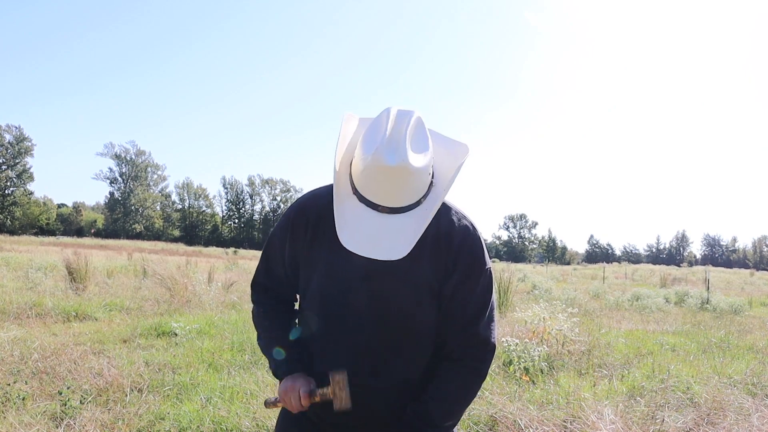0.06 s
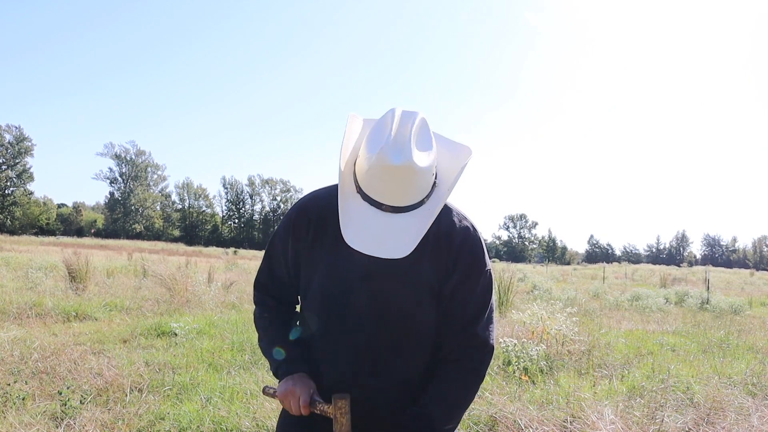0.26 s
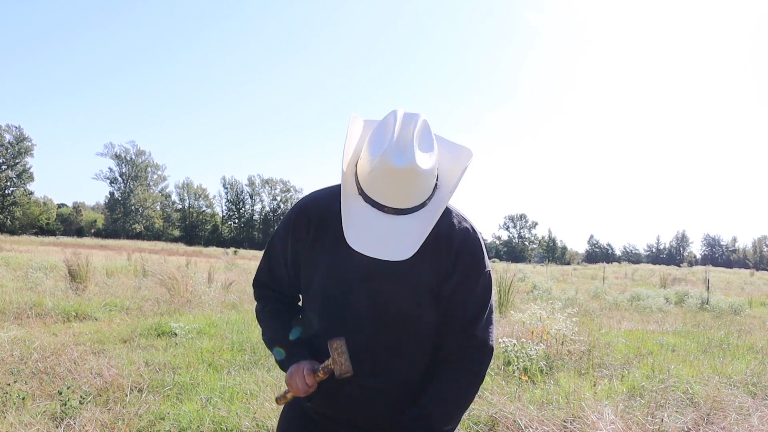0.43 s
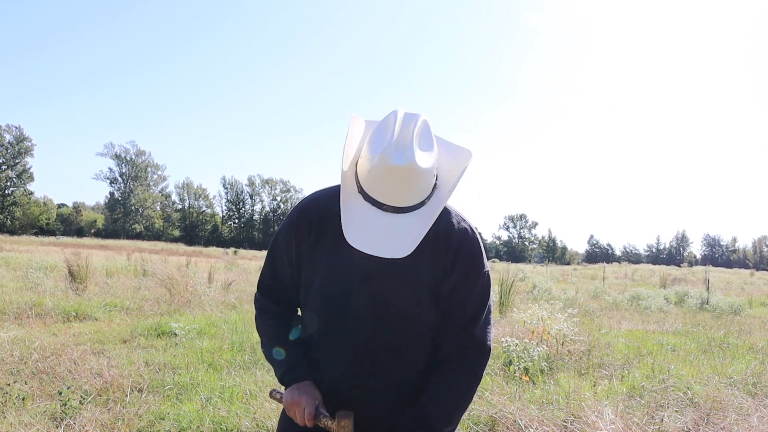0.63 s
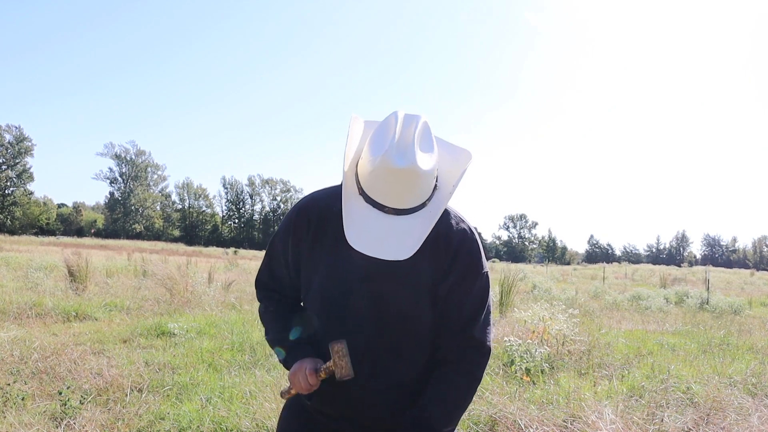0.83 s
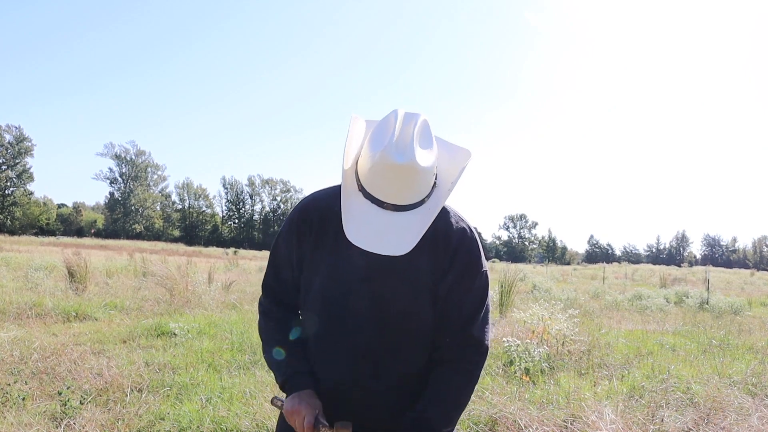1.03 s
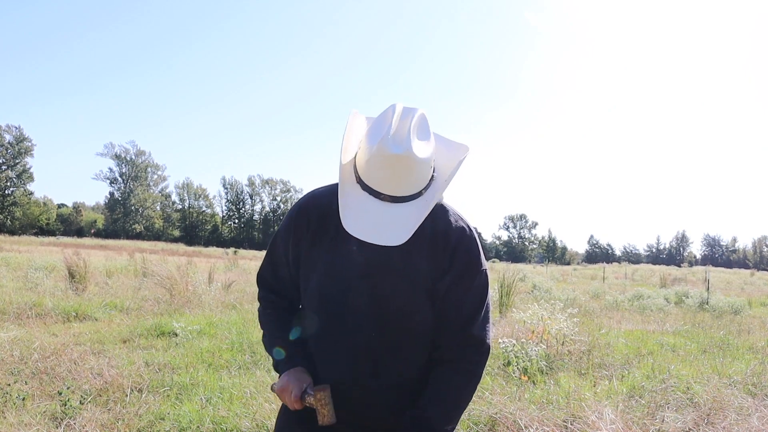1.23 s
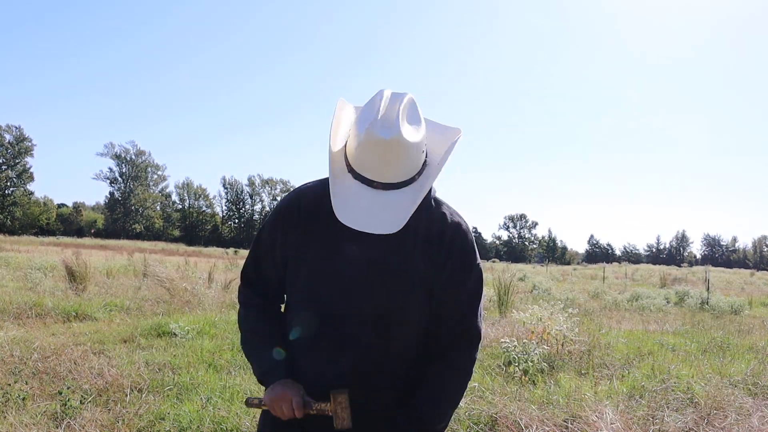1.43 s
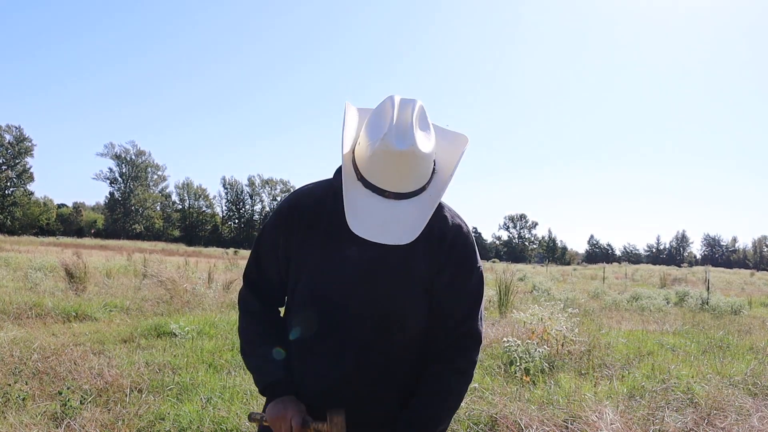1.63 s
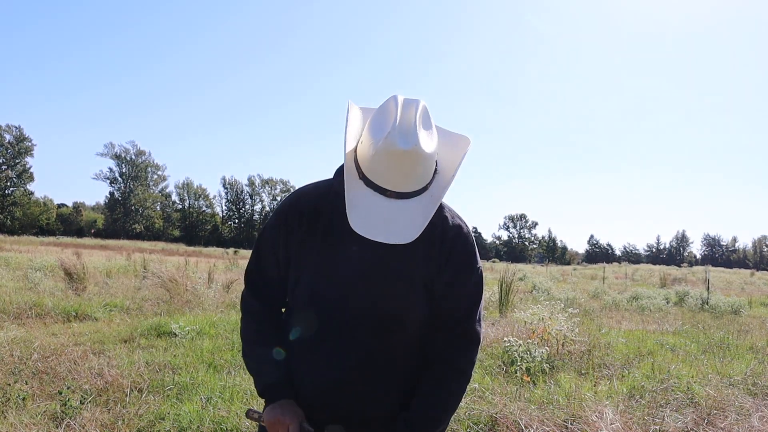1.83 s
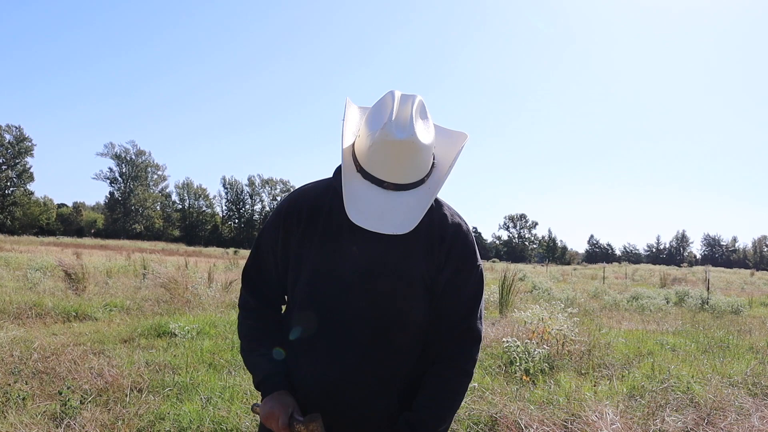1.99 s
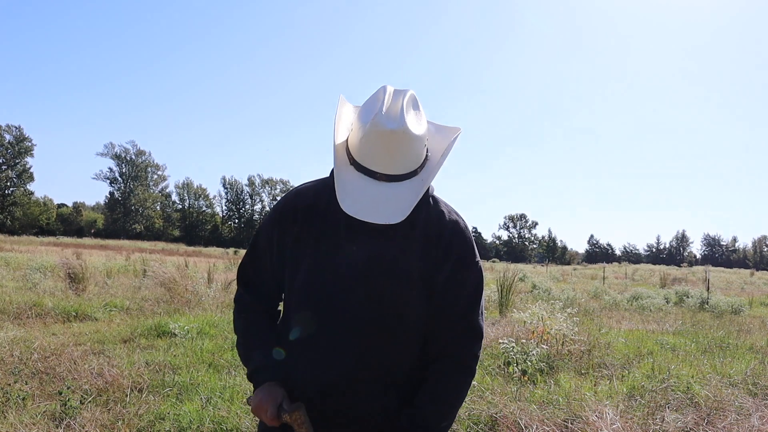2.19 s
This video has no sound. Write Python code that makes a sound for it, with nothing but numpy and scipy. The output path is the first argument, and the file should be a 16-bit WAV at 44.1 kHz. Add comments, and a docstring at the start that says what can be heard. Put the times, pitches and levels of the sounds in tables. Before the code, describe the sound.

Four sharp hammer blows drive a post into the ground while insects chirp in a field.

```python
"""A hammer drives a short post into a field with four blows, close to the microphone.
Each blow cracks, the post judders a few milliseconds into the soil and knocks more hollowly as it
sinks; the hammer head rings and the soil thuds. A light touch precedes the last blow.
Insects rasp their wings in the grass, far birds whistle, and a breeze buffets the microphone
over soft open air and a far rush."""
import sys
import numpy as np
from scipy import signal
from scipy.fft import rfft, irfft, next_fast_len
from scipy.io import wavfile
from scipy.ndimage import uniform_filter1d

SR = 44100
rng = np.random.default_rng(int(sys.argv[2]) if len(sys.argv) > 2 else 0)


def log_audio(samples):
    """Write samples as a 16-bit WAV file to the path given in sys.argv[1]."""
    # one column per channel
    frames = np.atleast_2d(samples).T
    # limit to full scale, then quantise
    limited = np.clip(frames, -1, 1)
    pcm = np.round(limited * 32767).astype(np.int16)
    wavfile.write(sys.argv[1], SR, pcm)


N = 103635

# spectrum of the crack and the grit: freq_hz, density_db
CRACK_SPECTRUM = [(200, -18.5), (1000, -6), (2000, -1), (3000, 5.5), (6000, 5.5), (10000, -3),
                  (13000, -3.5), (16000, -11.5)]


def undb(db):
    """Decibels to gain."""
    return 10 ** (np.asarray(db) / 20)


def unit(x):
    """Scale to rms 1."""
    return x / np.sqrt(np.mean(x ** 2) + 1e-18)


def colour(x, spectrum):
    """Minimum-phase filter through (freq_hz, gain_db) points."""
    hz, db = np.array(spectrum).T
    size = next_fast_len(len(x) + 4096, True) * 2
    bin_hz = np.arange(size // 2 + 1) * SR / size
    gain_db = np.interp(np.log(bin_hz + 1e-9), np.log(hz), db)
    cepstrum = irfft(np.log(undb(gain_db)))
    cepstrum[1:size // 2] *= 2
    cepstrum[size // 2 + 1:] = 0
    return irfft(rfft(x, size) * np.exp(rfft(cepstrum)))[:len(x)]


def noise(spectrum, count):
    """Coloured noise, rms 1."""
    return unit(colour(rng.standard_normal(count), spectrum))


def resonate(x, hz, width_hz):
    """Resonance, gain 1 at centre."""
    return signal.lfilter(*signal.iirpeak(hz, hz / width_hz, SR), x)


def walk(rate_hz):
    """Smooth random wander, rms 1."""
    hold = int(SR / rate_hz)
    steps = np.repeat(rng.standard_normal(N // hold + 1), hold)
    return unit(uniform_filter1d(uniform_filter1d(steps, hold), hold)[:N])


def fade(t, t60_s):
    """Full level until t = 0, then exponential decay."""
    return np.exp(-np.log(1000) * np.maximum(t, 0) / t60_s)


def swell(centre_s, length_s):
    """Gaussian envelope, peak 1."""
    return np.exp(-(2 * (np.arange(N) / SR - centre_s) / length_s) ** 2)


def contour(points):
    """Straight lines through (time_s, level_db) points."""
    return np.interp(np.arange(N) / SR, *np.array(points).T)


def ring(t, modes):
    """Free ringing of (pitch_hz, level_db, t60_s) modes."""
    return sum(undb(db) * fade(t, t60_s) * np.sin(2 * np.pi * hz * t) for hz, db, t60_s in modes)


def swelling_ring(t, delay_s, modes, rise_s):
    """Modes driven up to a peak near the delay, then left to ring."""
    return ring(t - delay_s, modes) * np.minimum(t / rise_s, 1) * np.exp(np.minimum(t - delay_s, 0) / rise_s)


def add(out, start_s, sound):
    """Mix in at start_s."""
    i = int(start_s * SR)
    out[i:i + len(sound)] += sound[:max(N - i, 0)]


def field():
    """Soft open air; a far rush dies away and returns."""
    # spectra: freq_hz, density_db
    air_spectrum = [(30, -1.5), (120, 8.5), (250, 3.5), (400, 1.5), (700, -3), (1400, -15.5), (2000, -13),
                    (3200, -14.5), (5000, -20.5), (7000, -21.5), (11000, -19.5), (14500, -14.5),
                    (16000, -21.5)]
    rush_spectrum = [(200, -21), (450, -10.5), (700, -5), (1050, 3.5), (1400, -2), (2000, -17.5),
                     (3500, -25.5), (8000, -48)]
    # rush envelope: time_s, level_db
    rush_levels = [(0, -49), (.55, -52), (1.35, -52), (1.9, -60.5), (2.35, -52.5)]
    return undb(-48) * noise(air_spectrum, N) + undb(contour(rush_levels)) * noise(rush_spectrum, N)


def wind():
    """Gusts rumble and puff on the microphone."""
    # gust envelope: time_s, relative_db
    gusts = [(0, -44.5), (.28, -39), (.33, -27.5), (.47, -27.5), (.53, -35.5), (.87, -25.5), (.95, -23),
             (1.06, -18.5), (1.22, -22), (1.28, -25), (1.35, -21), (1.43, -29), (1.62, -30.5),
             (1.75, -25.5), (1.83, -32), (1.89, -28), (2.0, -28.5), (2.35, -29)]
    # sharper buffets: centre_s, length_s, level_db
    puffs = [(0.911, 0.019, -32), (0.945, .03, -21), (1.052, 0.024, -18.5), (1.112, 0.034, -24),
             (1.732, 0.25, -35)]
    # spectra: freq_hz, density_db
    rumble_spectrum = [(12, -4), (22, 6), (45, 1.5), (65, -6.5), (100, -7.5), (150, -18), (220, -28),
                       (320, -30.5), (600, -47), (1500, -90)]
    puff_spectrum = [(40, -15.5), (100, 1), (170, -4), (260, -10), (400, -34.5), (900, -41.5), (2000, -60)]
    rumble_db = 1 + contour(gusts) + walk(rate_hz=54)
    puff_gain = sum(undb(db) * swell(centre_s, length_s) for centre_s, length_s, db in puffs)
    return undb(rumble_db) * noise(rumble_spectrum, N) + puff_gain * noise(puff_spectrum, N)


def rasp(hz, width_hz, tooth_hz=165):
    """Wing teeth rasp a narrow resonance; rms 1."""
    rate_hz = tooth_hz * (1 + .1 * walk(27))
    strokes = 1 + .6 * np.sin(2 * np.pi * np.cumsum(rate_hz) / SR)
    friction = strokes * rng.standard_normal(N)
    return unit(resonate(resonate(friction, hz, width_hz), hz, width_hz))


def insect(chirps, hz, width_hz, length_s):
    """One insect rasps in short swelling chirps."""
    return rasp(hz, width_hz) * sum(undb(db) * swell(centre_s, length_s) for centre_s, db in chirps)


def insects():
    """A near insect and a lower-pitched one chirp over a wavering chorus."""
    # chirps: centre_s, level_db
    near_chirps = [(.04, -50), (.195, -46.5), (.41, -51), (.61, -48.5), (.805, -54), (.965, -50.5),
                   (1.2, -54.5), (1.405, -51.5), (1.515, -49), (1.71, -48.5), (1.925, -51), (2.11, -48.5),
                   (2.3, -48)]
    low_chirps = [(.135, -54), (.32, -63), (.51, -55.5), (.69, -64), (.875, -59), (1.09, -57),
                  (1.28, -59.5), (1.46, -58), (1.645, -55), (1.84, -63), (2.02, -59), (2.2, -63)]
    # far insect groups: pitch_hz, width_hz, level_db
    groups = [(8530, 900, -61.5), (8800, 630, -57), (9370, 650, -57.5), (9720, 700, -58.5)]
    chorus = sum(undb(db - 0.4 * walk(rate_hz=19)) * rasp(hz, width_hz) for hz, width_hz, db in groups)
    near = insect(near_chirps, hz=8950, width_hz=380, length_s=.062)
    low = insect(low_chirps, hz=7850, width_hz=700, length_s=.07)
    return chorus + near + low


def tilt_db(hz, db_per_oct, pivot_hz=3000):
    """Brightness slope about the pivot."""
    return db_per_oct * np.log2(hz / pivot_hz)


def judder(t, slide_s, t60_s, grit_db, db_per_oct):
    """The post sticks and slips through soil: dense jolts ring its body, grit rasps along it."""
    # damped post resonances: pitch_hz, width_hz, relative_db
    modes = [(831.4, 160, -0.5), (1220, 210, 0.5), (1501, 270, -3), (1944, 200, -9), (2532, 122, 3),
             (2908, 191.6, 0.5), (3290, 130, 3), (3713, 200, -5.5), (4027, 200, -8.5), (4830, 200, -1),
             (5360, 244, 0), (6830, 780, -12), (8160, 410, -7.5), (9830, 1200, -11), (12160, 700, -28.5)]
    slip_rate_hz, spread_db, sag_db = 4865, 2.5, 2.5
    rebound_s, rebound_width_s, rebound_db = 0.0038, 0.00037, 4.5  # the hammer face lands again
    slips = (rng.random(len(t)) < slip_rate_hz / SR) * rng.choice([-1, 1], len(t))
    jolts = slips * undb(spread_db * rng.standard_normal(len(t)))
    push = undb(-sag_db * np.minimum(t / slide_s, 1))
    rebound = undb(rebound_db * np.exp(-((t - rebound_s) / rebound_width_s) ** 2))
    force = jolts * push * rebound * fade(t - slide_s, t60_s)
    body = np.zeros(len(t))
    for k, (hz, width_hz, db) in enumerate(modes):
        gain = (-1) ** k * undb(db + tilt_db(hz, db_per_oct)) * np.sqrt(width_hz)
        body += gain * unit(resonate(force, hz, width_hz))
    body /= np.sqrt(np.sum(body ** 2) / (slide_s * SR))
    grit = undb(grit_db) * noise(CRACK_SPECTRUM, len(t)) * push * fade(t - slide_s, t60_s=0.025)
    return body + grit


def post_knock(t, delay_s, knock_db, clack_db):
    """The post knocks hollowly and brakes in the soil with a quickly damped clack."""
    # modes: pitch_hz, relative_db, t60_s
    knock_modes = [(951, 1.5, 0.055), (1000, -21, 0.14), (1386, -22.5, 0.047), (567, -13, 0.023)]
    clack_modes = [(894, -5, 0.016), (284, -5, 0.018)]
    knock = undb(knock_db) * swelling_ring(t, delay_s, knock_modes, rise_s=0.0053)
    clack = undb(clack_db) * swelling_ring(t, delay_s, clack_modes, rise_s=0.0005)
    return knock + clack


def head_ring(t, head_db, db_per_oct):
    """The hammer head rings in three modes."""
    # head modes: pitch_hz
    pitches_hz = (2729, 4735, 5195)
    # ring per mode: relative_db, t60_s
    decays = [(-9, 0.11), (-10.5, .04), (-1.5, 0.074)]
    return ring(t, [(hz, head_db + db + tilt_db(hz, db_per_oct), t60_s)
                    for hz, (db, t60_s) in zip(pitches_hz, decays)])


def soil(t, slide_s, thud_db):
    """Soil thud and a brief scatter off the ground; both decay after the slide."""
    # spectra: freq_hz, density_db
    thud_spectrum = [(80, 0.5), (160, -7), (275, 5.5), (400, -9), (560, -3.5), (700, -8.5), (1500, -23.5),
                     (6000, -64)]
    scatter_spectrum = [(150, -5.5), (300, -12), (1000, 6), (2000, -9.5), (3000, -7), (6000, -18),
                        (10000, -29), (16000, -18)]
    thud = undb(thud_db) * noise(thud_spectrum, len(t)) * fade(t - slide_s, t60_s=0.13)
    scatter = undb(-27) * noise(scatter_spectrum, len(t)) * fade(t - slide_s, t60_s=0.067)
    return thud + scatter


def hammer():
    """Each blow cracks on contact and excites post, head and soil."""
    # blows: start_s, judder_db, slide_s, judder_t60_s, crack_db, knock_db, clack_db, knock_delay_s,
    # head_db, head_db_per_oct, thud_db, grit_db, post_db_per_oct
    blows = [(.221, -9, 0.0077, 0.023, 0.5, -21.5, -22, .012, -16.5, 6, -22.5, -8, 2),
             (.643, -9.5, 0.01, 0.019, -2, -16, -8.5, .012, -20.5, 2.5, -23.5, -13.5, 0.5),
             (1.0692, -9, 0.011, 0.0091, -18, -8, -9, .007, -18.5, 5, -19.5, -7.5, 0.5),
             (1.7747, -10.5, 0.0057, 0.013, -6, -3.5, -8.5, 0.004015, -30.5, 11.5, -22.5, -2.5, 0.5)]
    out, t = np.zeros(N), np.arange(SR // 4) / SR
    for (start_s, judder_db, slide_s, judder_t60_s, crack_db, knock_db, clack_db, knock_delay_s,
         head_db, head_db_per_oct, thud_db, grit_db, post_db_per_oct) in blows:
        crack = undb(crack_db) * noise(CRACK_SPECTRUM, len(t)) * fade(t, t60_s=0.0098)
        body = undb(judder_db) * judder(t, slide_s, judder_t60_s, grit_db, post_db_per_oct)
        knock = post_knock(t, knock_delay_s, knock_db, clack_db)
        head = head_ring(t, head_db, head_db_per_oct)
        add(out, start_s, crack + body + knock + head + soil(t, slide_s, thud_db))
    return out


def birds():
    """Thin gliding whistles that waver with distance."""
    # far whistles: start_s, length_s, from_hz, to_hz, level_db
    whistles = [(0.876, 0.3, 3380, 3210, -62.5), (1.119, 0.11, 3220, 3030, -62.5),
                (1.46, 0.22, 3360, 3100, -59.5), (2.02, 0.13, 3780, 3850, -63.5),
                (2.091, 0.048, 2124, 1760, -58), (2.121, 0.058, 1930, 2250, -57.5),
                (2.324, 0.047, 2530, 2350, -49)]
    out = np.zeros(N)
    for start_s, length_s, from_hz, to_hz, db in whistles:
        count = int(length_s * SR)
        progress = np.linspace(0, 1, count)
        hz = (from_hz + (to_hz - from_hz) * progress) * (1 + 0.0033 * walk(130)[:count])
        gain = undb(db + 2 * walk(70)[:count])
        arch = np.sqrt(np.abs(np.sin(np.pi * progress ** .6)))
        add(out, start_s, gain * arch * np.sin(2 * np.pi * np.cumsum(hz) / SR))
    return out


def light_touch():
    """A light touch ticks before the last blow."""
    # tick spectrum: freq_hz, density_db
    spectrum = [(500, -7), (1200, -4), (2000, -18), (3000, -9), (6000, -14), (9000, -27), (16000, -36)]
    out, t = np.zeros(N), np.arange(SR // 4) / SR
    tick = undb(-29) * noise(spectrum, len(t)) * fade(t, t60_s=.009)
    add(out, start_s=1.6435, sound=tick)
    return out


def scene():
    """Hammering in the open field, mono."""
    return (hammer() + light_touch() + insects() + birds() + wind() + field())[None]


def record(dry):
    """The recorder overloads on the blows and cuts the top."""
    drive, cutoff_hz = 0.89, 16000
    driven = drive * dry
    clipped = driven / (1 + driven ** 6) ** (1 / 6)
    return signal.sosfilt(signal.ellip(8, .2, 70, cutoff_hz, fs=SR, output="sos"), clipped)


dry = scene()
out = record(dry)
log_audio(out)
```